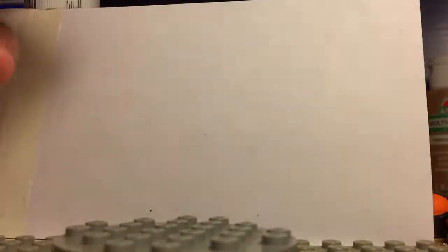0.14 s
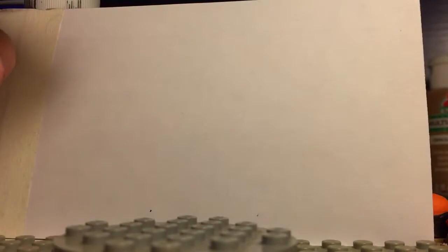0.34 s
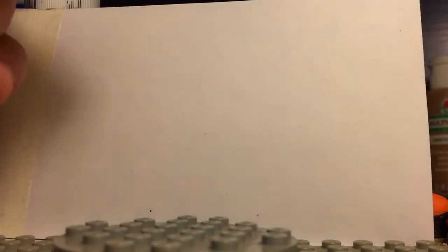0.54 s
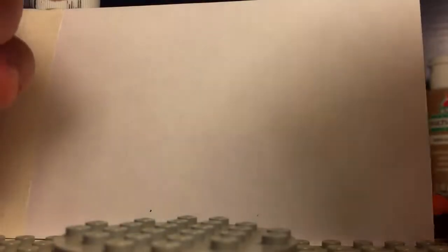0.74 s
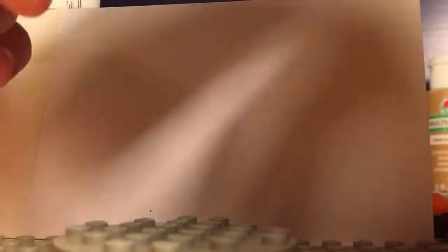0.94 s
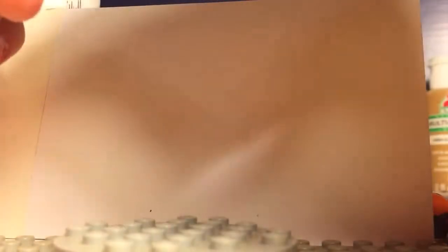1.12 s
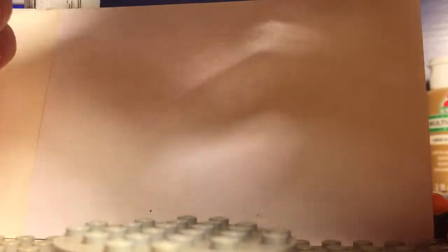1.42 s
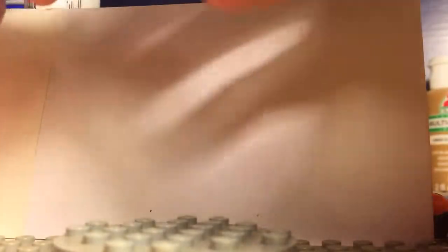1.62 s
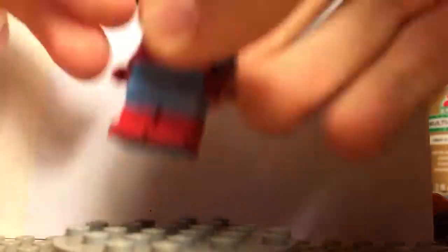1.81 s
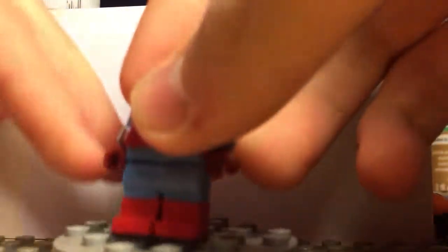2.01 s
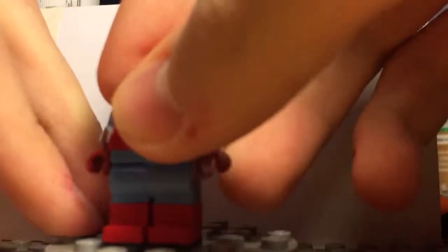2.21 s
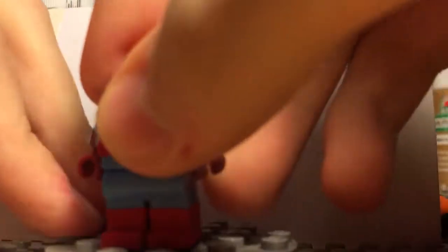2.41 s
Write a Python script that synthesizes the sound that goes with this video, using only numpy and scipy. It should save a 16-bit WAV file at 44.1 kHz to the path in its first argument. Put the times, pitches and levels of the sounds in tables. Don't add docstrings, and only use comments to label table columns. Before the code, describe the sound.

A stiff plastic toy joint creaks: light ticks from 0.23 s, a sharp crack at 0.45, then jerky clicks quickening and fading into chatter by 0.72. A softer, shorter creak follows at 0.8-0.9. Faint hum and hiss remain, with tiny knocks near 1.14 and 1.63. At 2.1 a crisp plastic double snap onto a studded plate, then skin rubs and dull knocks until 2.54. Close, dry phone microphone.

```python
import sys
import numpy as np
from scipy import signal
from scipy.fft import rfft, irfft
from scipy.io import wavfile
from scipy.ndimage import uniform_filter1d

SR = 44100
rng = np.random.default_rng(int(sys.argv[2]) if len(sys.argv) > 2 else 0)


def dump(signal):
    limited = np.clip(np.atleast_2d(signal).T, -1, 1)
    pcm = np.round(limited * 32767).astype(np.int16)
    wavfile.write(sys.argv[1], SR, pcm)


def voltage_ratio(decibels):
    exponent = np.asarray(decibels, float) / 20
    return 10 ** exponent


N = 112454

# (frequency [Hz], level [dB])
ROOM_SPECTRUM = [(20, -20.5), (50, 1.5), (95, 3), (170, -3), (230, -7), (400, -11), (600, -12.5),
                 (9000, -23.5), (15800, -30.5)]
# (frequency [Hz], level [dB], rate of phase wander [Hz])
HUM_PARTIALS = [(59.6, -81.5, 2), (121, -68, 13), (236, -89.5, 3.1)]
# (time [s], peak level [dB], relative treble level [dB])
JOINT_SLIPS = [(0.2313, -30, -30), (0.4479, -17, -8.5), (0.46, -28, -14), (0.4944, -20.5, -10.5),
               (0.5266, -21.5, -13.5), (0.5559, -23.5, -13.5), (0.573, -28.5, -24.5), (0.5898, -29.5, -26),
               (0.6025, -31, -30), (0.6174, -28, -15), (0.631, -31.5, -28), (0.6426, -30, -17.5),
               (0.6556, -29.5, -20), (0.668, -30.5, -17), (0.6797, -33.5, -28), (0.689, -36, -30),
               (0.8368, -33, -15), (0.8478, -37, -23), (0.8508, -38.5, -22), (0.8573, -40.5, -20),
               (0.8616, -43, -16), (0.8665, -41.5, -26), (1.1441, -54.5, -30)]
# (time [s], level [dB])
JOINT_CHATTER = [(0.6939, -40.5), (0.6989, -42.5), (0.7036, -41), (.708, -39.5), (0.7122, -46),
                 (.7153, -44.5), (0.7185, -46), (0.7236, -49.5), (0.724, -51), (0.7261, -48), (.8029, -49),
                 (.8069, -68), (0.81, -47.5), (.8138, -51), (0.8165, -43), (.854, -50), (0.8596, -47),
                 (0.8636, -45), (0.8695, -43), (0.8719, -42), (0.8749, -48), (0.8779, -41), (.8825, -46.5),
                 (0.886, -44), (0.8874, -47), (0.89, -47), (0.895, -62), (0.898, -48.5), (0.901, -58),
                 (0.9031, -49.5), (.9058, -53)]
# (time [s], level [dB])
JOINT_CREEP = [
    (.26, -66.5),
    (.31, -66.5),
    (.36, -60.5),
    (.41, -59),
    (.445, -62),
    (.47, -73),
]
# (frequency [Hz], level [dB], T60 [s], first swing [+1 or -1])
JOINT_MODES = [(1546, -16.7, .028, -1), (1755, -18.7, .037, 1), (1913, -8.3, .019, 1),
               (2083, -2.2, .014, 1), (2284, -4, .012, 1), (2509, -10.9, .014, 1), (2718, .3, .006, -1),
               (2806, -16.6, .027, -1), (3053, -26, .05, 1), (3171, -16.5, .031, -1),
               (3658, -2.6, .011, -1), (3744, 5.5, .004, 1), (4069, -5.8, .004, -1), (4451, -11.6, .006, 1)]
JOINT_TREBLE_MODES = [(5180, -5.6, .014, -1), (5716, .5, .004, -1), (6158, -10.5, .015, -1),
                      (6381, -10.8, .023, -1), (7111, -8.1, .012, -1), (7437, -14.4, .027, -1),
                      (7976, -13.7, .027, 1), (8444, -5.8, .015, -1), (8825, -9.1, .004, -1),
                      (9336, -22, .03, 1)]
# (frequency [Hz], level [dB], T60 [s])
TABLE_MODES = [(230, -12.5, 0.041), (287, -19.5, 0.018), (418.6, -5, 0.025), (573, -18.5, 0.06),
               (780, -20.5, 0.076), (950, -8.5, 0.013), (1154, -17.5, 0.034)]
# (delay [s], level [dB])
REFLECTIONS = [
    (.0013, -19.5),
    (.0033, -11.5),
    (.0046, -25),
    (0.0163, -22),
]
# (time [s], level [dB], ring frequency [Hz], ring T60 [s], relative crack level [dB])
PART_TICKS = [(.255, -47, 7140, 0.045, 2), (.338, -40, 8840, 0.015, 2), (.338, -42, 6800, 0.013, -6),
              (.345, -33, 6284, 0.037, -1.5), (.346, -44, 9600, 0.026, -6), (.346, -50, 12400, 0.02, -18),
              (.448, -43.5, 12500, 0.014, 12.5), (0.443, -51, 5600, .012, 1), (0.497, -58, 12000, .008, 6),
              (.527, -62.5, 13100, 0.013, 5), (.5565, -60, 13000, .012, 2),
              (.8375, -62, 10100, 0.0089, 3.5), (2.116, -49, 8000, .012, -4), (.232, -62, 13400, 0.011, -2),
              (.345, -39.5, 2700, 0.033, 7), (.372, -55.5, 8300, 0.017, -1), (.372, -50.5, 5700, 0.024, -3),
              (.484, -55, 7000, 0.011, 15), (1.628, -67, 2420, 0.068, -9), (1.632, -46.5, 406, 0.025, -29),
              (1.633, -49.5, 200, 0.074, -17.5), (1.142, -54, 406, 0.034, -19),
              (1.64, -68.5, 2050, 0.13, -21), (2.227, -45, 348, 0.084, -18), (2.227, -56, 2360, 0.017, 11),
              (2.244, -51, 1380, 0.039, 8), (2.245, -53, 3600, 0.018, 5.5), (2.247, -42.5, 450, 0.022, -14),
              (2.41, -59.5, 347, 0.037, -19), (2.538, -49, 795, 0.038, -3), (2.54, -49, 394, 0.045, -22)]
# (start [s], peak [s], end [s])
RUB_TIMES = [
    (2.175, 2.22, 2.245),
    (2.23, 2.268, 2.289),
    (.31, .41, .447),
    (1.44, 1.46, 1.48),
    (1.59, 1.605, 1.63),
    (1.06, 1.08, 1.1),
    (2.105, 2.13, 2.2),
    (2.51, 2.54, 2.56),
    (.46, .6, .74),
    (.822, .85, .93),
]
# (level [dB], tilt [dB per octave])
RUB_LEVELS = [(-62.5, 0), (-56, -1.3), (-61, -3), (-77, 3), (-71.5, 1.5), (-90.5, 2), (-65.5, -3),
              (-70, -7.5), (-75.5, 5), (-68, -6)]
# (frequency [Hz], level [dB])
RUB_SPECTRUM = [(180, -47), (300, -26.5), (720, -10.5), (1180, -4), (1700, -9), (2690, -4), (15500, -14)]
# (time [s], level [dB], relative treble level [dB], relative bass level [dB])
SNAP_CONTACTS = [
    (2.0978, -16.5, -15.5, -16.5),
    (2.1021, -21.5, -7.5, -9),
    (2.1027, -16.5, -5.5, -12.5),
    (2.107, -42.5, -10, -2),
    (2.109, -31.5, -6.5, 2),
    (2.116, -34, -12, 2),
    (2.124, -48.5, 0, 8),
]
# (frequency [Hz], level [dB], T60 [s])
PLATE_MODES = [(1865, -11, .022), (2272, -8, .025), (2770, -7, .009), (3388, 0, .02), (3581, 0, .008),
               (4480, -6, .025)]
PLATE_TREBLE_MODES = [(5600, -3.5, 0.01), (6140, 5, 0.0061), (7550, -12, 0.009), (8550, 2.5, 0.006),
                      (9360, -11, 0.0071), (11500, -3.5, 0.0046), (14400, -14, .008)]
PLATE_BASS_MODES = [(59.6, -11, 0.16), (287, 0.5, 0.022), (365, -4, 0.078), (514, 2, 0.032),
                    (678, -9.5, 0.03), (953, -20, 0.055), (1326, -4.5, 0.05)]
# (frequency [Hz], level [dB], T60 [s])
SEATED_MODES = [(1370, -17, 0.031), (2020, -4.5, 0.017), (2420, -8, 0.022), (2690, 2.5, 0.011),
                (3220, -3, 0.015), (3650, 4, 0.013), (4290, -7.5, 0.02), (5134, -13, 0.022)]


def colour(points, tilt_db=0.):
    hz, level_db = np.array(points).T
    f = np.arange(N // 2 + 1) * SR / N + 1
    db = np.interp(np.log(f), np.log(hz), level_db) + tilt_db * np.log2(f / 3000)
    x = irfft(rfft(rng.standard_normal(N)) * voltage_ratio(db), N)
    return x / x.std()


def walk(rate_hz):
    k = int(SR / rate_hz)
    steps = np.repeat(rng.standard_normal(N // k + 1), k)
    x = uniform_filter1d(uniform_filter1d(steps, k), k)[:N]
    return x / x.std()


def ring(modes):
    rise_cycles = 1.43
    t = np.arange(SR // 4) / SR
    out = np.zeros(len(t))
    for k, (hz, db, t60) in enumerate(modes):
        envelope = 1000 ** (-t / t60) * (1 - np.exp(-t * hz / rise_cycles))
        out += (-1) ** k * voltage_ratio(db) * np.sin(2 * np.pi * hz * t) * envelope
    return out / np.sqrt(len(modes))


def parts(modes, lag_s, spread_s):
    out = np.zeros(SR // 4)
    for hz, db, t60, way in modes:
        arrival_s = lag_s + spread_s * (np.sqrt(3000 / hz) - 1)
        t = np.maximum(np.arange(SR // 4) / SR - arrival_s, 0)
        envelope = 1000 ** (-t / t60) * (1 - np.exp(-t * hz / 2))
        out += way * voltage_ratio(db) * np.sin(2 * np.pi * hz * t) * envelope
    return out


def crack(t60, lo_hz, hi_hz):
    t = np.arange(SR // 20) / SR
    band = signal.butter(2, [lo_hz, min(hi_hz, 16000)], "band", fs=SR, output="sos")
    return signal.sosfilt(band, rng.standard_normal(len(t)) * 1000 ** (-t / t60))


def strike(times, dbs, response):
    blows = np.zeros(N)
    places = np.clip((np.asarray(times) * SR).astype(int), 0, N - 1)
    np.add.at(blows, places, voltage_ratio(np.asarray(dbs)))
    return signal.fftconvolve(blows, response)[:N]


def dull(x, hz):
    return signal.sosfiltfilt(signal.butter(2, hz, fs=SR, output="sos"), x)


def room():
    t = np.arange(N) / SR
    hum = np.zeros(N)
    for hz, db, wander_hz in HUM_PARTIALS:
        level = voltage_ratio(db + walk(21))
        hum += level * np.sin(2 * np.pi * hz * t + 0.13 * walk(wander_hz))
    return voltage_ratio(-71 + 0.21 * walk(2.8)) * colour(ROOM_SPECTRUM) + hum


def creak():
    slips, chatter = np.array(JOINT_SLIPS), np.array(JOINT_CHATTER)
    lag_s, chatter_treble_db = .0003, -29
    slip_s, chatter_s = slips[:, 0] + lag_s, chatter[:, 0] + lag_s
    slip_db, chatter_db = slips[:, 1], chatter[:, 1]
    all_s = np.r_[slip_s, chatter_s]
    treble_db = np.r_[slip_db + slips[:, 2] + 3, chatter_db + chatter_treble_db]

    shoulder = voltage_ratio(-11.5) * parts(JOINT_TREBLE_MODES[:2], lag_s=.0003, spread_s=.00048)
    table = ring(TABLE_MODES)
    body = parts(JOINT_MODES, lag_s=.000244, spread_s=.00095) + table + shoulder
    treble = parts(JOINT_TREBLE_MODES[2:], lag_s=.0003, spread_s=.00048)

    jerks = strike(slip_s, slip_db + 3.0, body)
    jerks = jerks + strike(all_s, treble_db, treble)
    jerks = jerks + strike(all_s, treble_db - 8, crack(0.06, 5920, 9060))
    soft = strike(chatter_s, chatter_db + 5.0, body)

    creep_db = np.interp(np.arange(N) / SR, *np.array(JOINT_CREEP).T, left=-150, right=-150)
    push = rng.standard_normal(N) * voltage_ratio(creep_db - 6.5 + 1.5 * walk(500))
    push[:int(.24 * SR)] = 0
    creep_body = body + voltage_ratio(4.5) * table + ring([(413.0, -12, 0.025)])
    creep = signal.fftconvolve(dull(push, 3170), creep_body)[:N]
    return dull(jerks, 9800) + dull(soft, 4200) + creep


def ticks():
    out = np.zeros(N)
    for s, db, hz, t60, crack_db in PART_TICKS:
        out += strike([s], [db], ring([(hz, 0, min(t60, 230 / hz))]))
        out += strike([s], [db + crack_db], crack(.018, hz * .6, hz * 1.4))
    return out


def rubs():
    t = np.arange(N) / SR
    grain = voltage_ratio(1.5 * walk(900) + .6 * walk(90))
    out = np.zeros(N)
    for times, (db, tilt_db) in zip(RUB_TIMES, RUB_LEVELS):
        swell = np.interp(t, times, [0, 1, 0]) ** .8
        out += voltage_ratio(db) * swell * colour(RUB_SPECTRUM, tilt_db)
    return grain * out


def snap():
    s, level_db, treble_db, bass_db = np.array(SNAP_CONTACTS).T
    out = strike(s, level_db + treble_db, ring(PLATE_TREBLE_MODES))
    out = out + strike(s, level_db + bass_db, ring(PLATE_BASS_MODES))
    free_plate = ring(PLATE_MODES[::2]) + ring(PLATE_MODES[1::2])
    out = out + strike(s[:1], level_db[:1], free_plate)
    out = out + strike(s[1:], level_db[1:], ring(SEATED_MODES))
    for time, db, top_db, low_db in SNAP_CONTACTS:
        burst = voltage_ratio(-13) * crack(0.021, 2000, 5900)
        burst = burst + voltage_ratio(top_db - 6) * crack(0.0064, 4200, 7400)
        burst = burst + voltage_ratio(low_db - 1.0) * crack(0.037, 230, 1100)
        out = out + strike([time], [db], burst)
    return out


def scene():
    t = np.arange(SR // 4) / SR
    tail_noise = signal.lfilter(*signal.butter(1, 3500, fs=SR), rng.standard_normal(len(t)))
    tail = tail_noise * 1000 ** (-t / .055) * voltage_ratio(-32)
    direct = t == 0
    space = tail + direct
    for delay_s, db in REFLECTIONS:
        space[int(delay_s * SR)] += voltage_ratio(db)
    background = room()
    joint = signal.fftconvolve(creak(), voltage_ratio(-3) * tail + direct)
    hits = signal.fftconvolve(ticks() + snap(), space)
    return ((joint + hits)[:N] + rubs() + background)[None]


def band_limit(x):
    return signal.sosfilt(signal.butter(12, 16360, fs=SR, output="sos"), x)


def record(dry):
    low_cut = signal.butter(2, 40, "high", fs=SR, output="sos")
    top_cut = signal.ellip(8, .2, 60, 15750, fs=SR, output="sos")
    mix = signal.sosfilt(top_cut, signal.sosfilt(low_cut, dry))
    return band_limit(mix)


dry = scene()
out = record(dry)
dump(out)
```